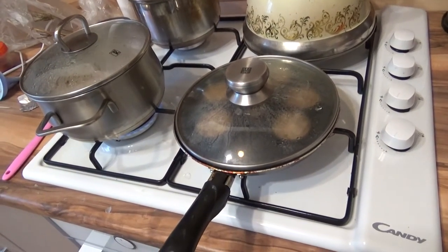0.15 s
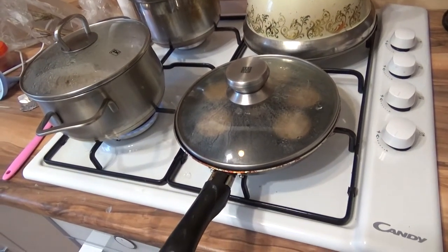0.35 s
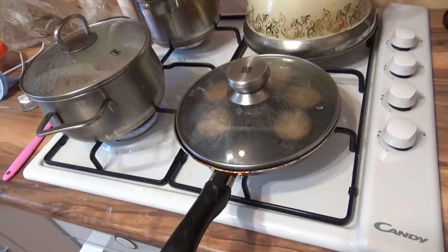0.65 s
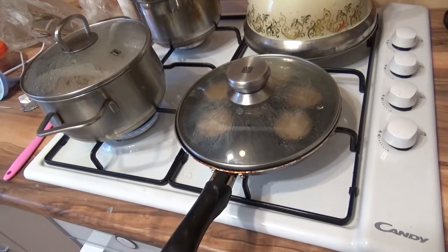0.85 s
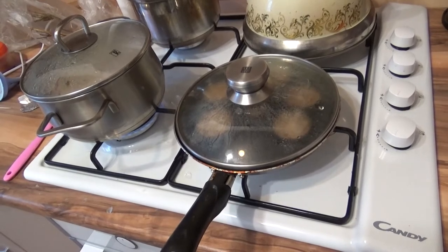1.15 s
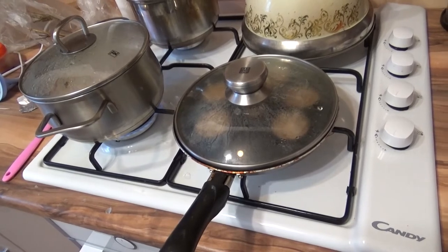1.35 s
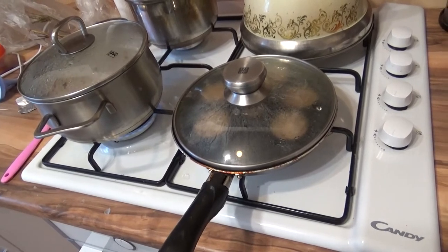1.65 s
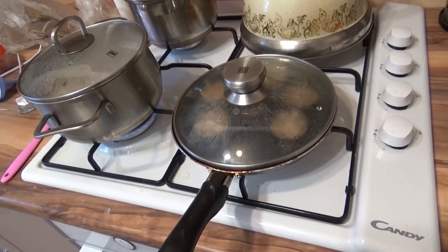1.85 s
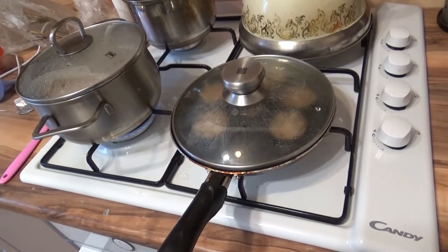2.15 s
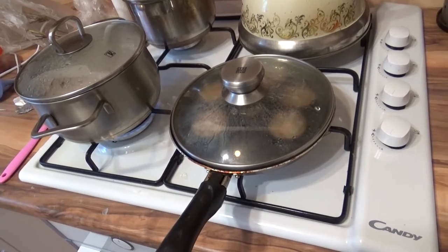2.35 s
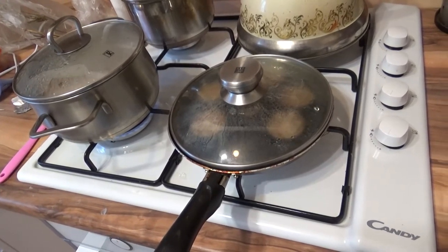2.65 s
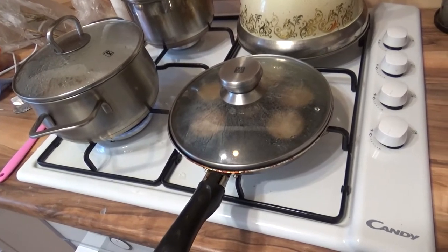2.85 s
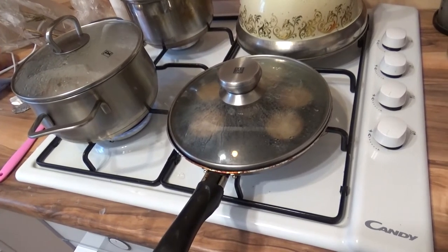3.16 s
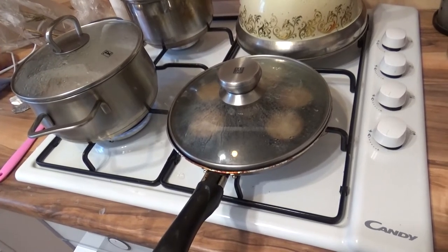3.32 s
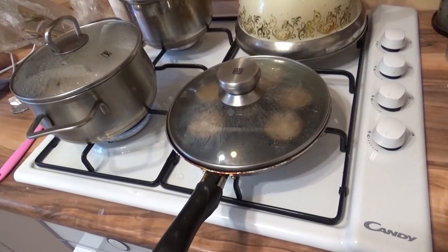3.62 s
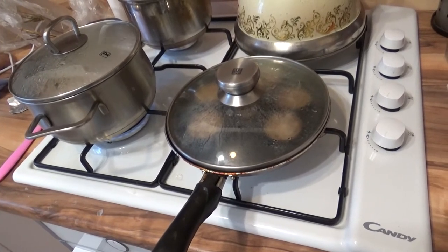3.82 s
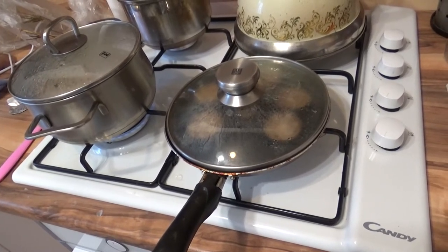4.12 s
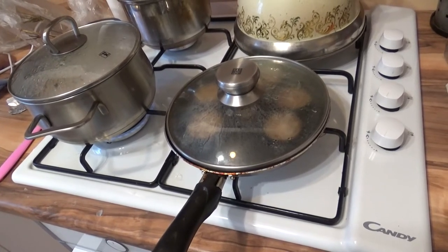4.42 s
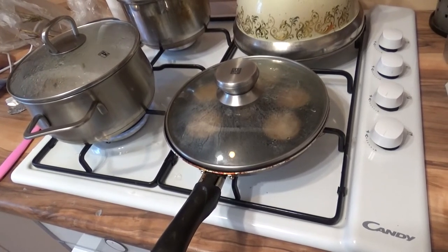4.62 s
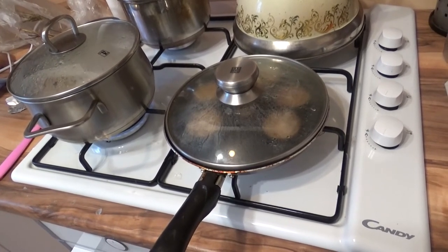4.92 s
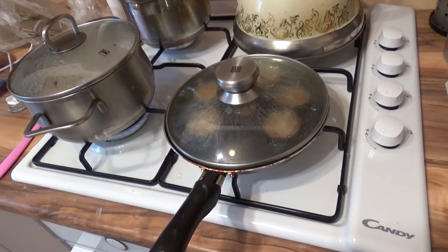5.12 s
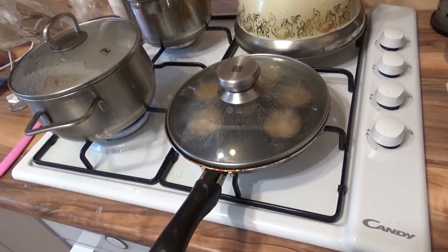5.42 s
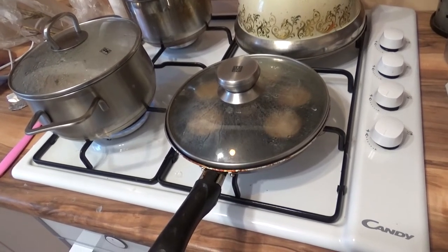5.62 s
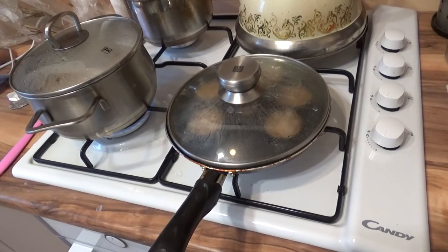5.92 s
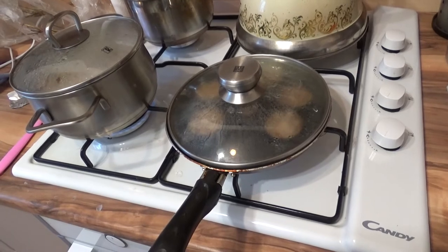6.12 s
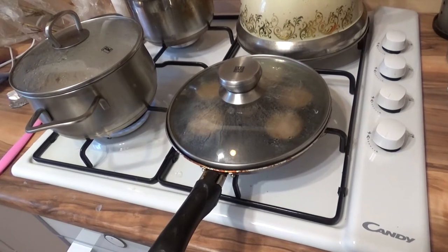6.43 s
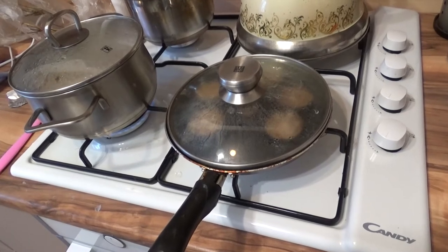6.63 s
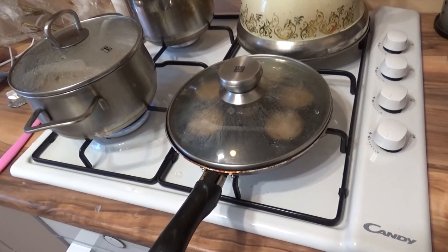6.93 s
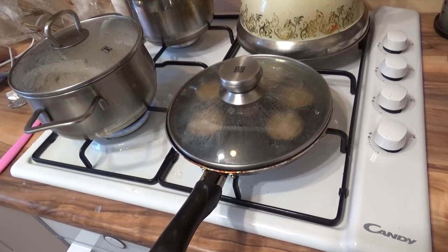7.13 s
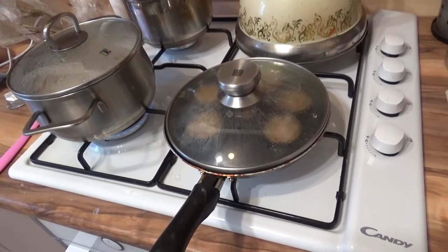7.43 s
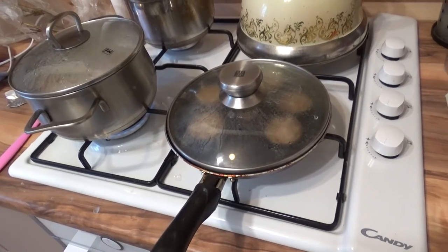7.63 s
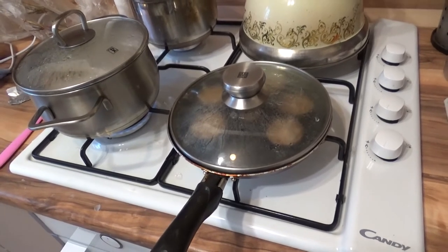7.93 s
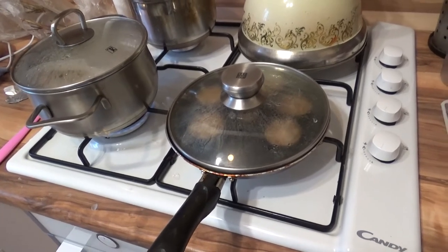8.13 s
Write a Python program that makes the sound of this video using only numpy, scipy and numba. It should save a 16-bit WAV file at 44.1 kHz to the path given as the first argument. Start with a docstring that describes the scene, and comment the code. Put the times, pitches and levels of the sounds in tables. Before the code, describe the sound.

Vegetable slices sizzle in oil in a lidded pan on a gas stove, heard from very close in a small kitchen. A steady fine fizz runs throughout, crossed by irregular bright pops and dry cracks, with occasional soft hollow thumps under the lid. Steam hiss is strongest at the start, then thins. A faint burner rush and a thin high gas whistle stay underneath.

```python
"""Sharp pitched pops and cracks over a steady fine sizzle: vegetable slices fry in oil under a glass lid
on a gas stove, heard from close by in a small kitchen. Bursting steam bubbles are swarms of decaying sines
that glide upward; noise cracks ring modes of pan and lid; bigger steam pockets thump the air under the lid.
Shaped noise makes the hiss of fine bubbles, escaping steam, burners and room; a wavering sine is the thin
whistle of a gas jet."""
import sys
import numpy as np
from scipy import signal
from scipy.fft import rfft, irfft, next_fast_len
from scipy.io import wavfile
from scipy.ndimage import uniform_filter1d
from numba import njit

SR = 44100
rng = np.random.default_rng(int(sys.argv[2]) if len(sys.argv) > 2 else 0)


def wrap_up_sound(samples):
    """Save the sound to the file named by the first command line argument, as 16-bit audio."""
    columns = np.atleast_2d(samples).T
    # keep every value between -1 and 1, then stretch to whole-number steps
    tamed = np.clip(columns, -1, 1)
    steps = np.round(tamed * 32767).astype(np.int16)
    wavfile.write(sys.argv[1], SR, steps)


N = 364707

# loudest bursts: start_s, swarm_db, bubble_pitch_hz, crack_db
BURSTS = [(0.083, -17, 9800, -30), (0.303, -18, 9400, -39), (0.313, -19, 6540, -31),
          (0.389, -32, 7340, -17.5), (0.467, -24, 9600, -24), (0.533, -18.5, 8100, -46),
          (0.609, -8.5, 8300, -17.5), (0.635, -26, 2900, -18), (0.6956, -21.5, 2960, -27),
          (0.731, -20, 10300, -32), (0.749, -15.5, 5500, -38), (0.7866, -17.5, 3180, -17),
          (0.877, -13, 9500, -19), (0.9392, -36, 1960, -16), (0.964, -19.5, 8700, -32),
          (1.001, -15.5, 8700, -27), (1.0903, -18, 9500, -17.5), (1.104, -20, 6900, -24),
          (1.132, -11.5, 10000, -27), (1.295, -21, 7900, -26), (1.3192, -12.5, 6850, -39),
          (1.333, -17, 8650, -29), (1.397, -19.5, 9500, -33), (1.438, -18, 9100, -33),
          (1.492, -9, 7100, -43), (1.539, -12, 9700, -27), (1.592, -15, 6050, -19.5),
          (1.636, -14, 10300, -19.5), (1.687, -9, 8840, -18.5), (1.88, -13.5, 10300, -22.5),
          (1.948, -18, 9280, -19.5), (2.015, -20, 10000, -17), (2.033, -18, 10000, -25),
          (2.127, -29, 2150, -19.5), (2.209, -17, 8300, -29), (2.2317, -5, 8900, -15),
          (2.2563, -21, 9700, -20.5), (2.286, -24, 8000, -21), (2.372, -18, 10000, -47),
          (2.3824, -16.5, 10000, -30), (2.4707, -18.5, 8670, -23), (2.551, -8.5, 7500, -17),
          (2.594, -18, 6540, -23), (2.608, -23, 1970, -19), (2.772, -21.5, 5940, -30),
          (2.9607, -18.5, 9200, -41), (2.9751, -30, 2500, -17), (2.982, -17.5, 6200, -33),
          (3.017, -24, 6300, -20), (3.0679, -21.5, 9050, -21), (3.192, -15.5, 5250, -34),
          (3.232, -12.5, 8400, -19), (3.3029, -9, 8760, -17), (3.326, -28, 2500, -30),
          (3.349, -23, 2500, -22), (3.499, -17, 6400, -24), (3.559, -20, 7060, -48),
          (3.671, -18.5, 7540, -46), (3.694, -19, 7500, -24), (3.8176, -13.5, 4540, -28),
          (3.9324, -19, 6830, -21.5), (3.975, -21, 2550, -22), (4.0035, -22, 4300, -16),
          (4.0284, -13, 4280, -16.5), (4.252, -26, 8600, -16.5), (4.307, -20, 4520, -23),
          (4.392, -21, 7600, -24), (4.405, -17, 10200, -32), (4.432, -12.5, 7100, -14),
          (4.521, -22, 8600, -43), (4.532, -10.5, 8200, -45), (4.587, -24, 3070, -31),
          (4.604, -12.5, 8550, -45), (4.6137, -18, 8800, -20), (4.766, -23, 8700, -25),
          (4.801, -23, 3250, -21), (4.822, -13, 10100, -27), (4.8325, -19, 4540, -23),
          (4.844, -18, 8900, -16), (4.923, -13.5, 9140, -25.5), (5.0048, -17.5, 4960, -22),
          (5.028, -14, 3480, -24), (5.037, -17, 8900, -24), (5.051, -16.5, 3100, -17.5),
          (5.159, -22, 2700, -20.5), (5.28, -22, 6650, -24.5), (5.364, -20, 7440, -31),
          (5.474, -33, 8250, -21), (5.687, -15, 9150, -21), (5.8057, -23, 3770, -43),
          (5.8378, -12.5, 5100, -17), (5.868, -23, 8500, -19), (5.879, -17, 6250, -32),
          (5.891, -30, 6340, -15), (6.345, -13.5, 9440, -25), (6.4421, -17.5, 4700, -32),
          (6.512, -15.5, 8100, -44), (6.5511, -21, 4513, -19.5), (6.6278, -18, 6240, -20),
          (6.6488, -15.5, 8900, -28), (6.6949, -18.5, 2320, -22), (6.7722, -16.5, 7300, -20.5),
          (6.8383, -14.5, 5200, -33.5), (6.8537, -15, 9300, -34), (6.867, -21.5, 9750, -31),
          (6.9137, -16, 4487, -21), (7.039, -15.5, 6200, -33), (7.059, -22.5, 4950, -28),
          (7.0909, -24, 2500, -20.5), (7.137, -12, 4280, -23.5), (7.168, -21.5, 4440, -28.5),
          (7.3344, -24, 2970, -18), (7.36, -22, 6500, -24), (7.421, -15.5, 8350, -42),
          (7.4432, -14.5, 6140, -24.5), (7.513, -9.5, 9140, -25.5), (7.562, -14.5, 5440, -32),
          (7.665, -23, 8440, -17), (7.717, -22, 2620, -16), (7.778, -20, 5200, -22.5),
          (7.8643, -8, 6700, -19), (7.9036, -13, 10100, -17.5), (7.963, -22, 4940, -27),
          (7.993, -16.5, 4460, -25), (8.076, -22, 9700, -17.5), (8.0999, -17, 7650, -22),
          (8.123, -12, 9050, -20), (8.1541, -7.5, 8350, -22.5)]
# spectrum of a crack: freq_hz, gain_db
CRACK_SPECTRUM = [(600, -10.5), (1250, -3), (2200, -8.5), (9000, -0.5), (11500, -5), (14000, -20),
                  (16000, -22)]
FIZZ_LIFE_S = 0.0057  # nominal time for a bubble to fall 53 dB
LEFT_RIGHT = np.array([[1], [-1]])


def undb(db):
    """Amplitude factor of a level in dB."""
    return 10 ** (np.asarray(db) / 20)


def level(x, rms_db):
    """Scale a sound to an RMS level."""
    return x * undb(rms_db) / np.sqrt(np.mean(x ** 2))


def colour(x, points):
    """Shape a spectrum by (freq_hz, gain_db) points, interpolated over log frequency."""
    hz, db = np.transpose(points)
    size = next_fast_len(N)
    f = np.arange(size // 2 + 1) * SR / size + 1  # +1 keeps the log finite
    gain = undb(np.interp(np.log(f), np.log(hz), db))
    return irfft(rfft(x, size) * gain, size)[..., :N]


def band(x, lo_hz, hi_hz):
    """Butterworth band-pass."""
    sos = signal.butter(2, [lo_hz, hi_hz], "bandpass", fs=SR, output="sos")
    return signal.sosfilt(sos, x)


def walk(rate_hz):
    """Random levels held 1 / rate_hz and slewed twice; spread near 1."""
    k = int(SR / rate_hz)
    held = np.repeat(rng.standard_normal(N // k + 1), k)
    return 1.3 * uniform_filter1d(uniform_filter1d(held, k), k)[:N]


def spikes(s, size):
    """Single-sample pushes at the given times."""
    return np.bincount(np.clip((s * SR).astype(int), 0, N - 1), size, N)


def ring(push, modes, scatter_db, turn=1):
    """Pushes ring damped modes, whose gains depend on the place struck; turn=-1 flips every other mode."""
    t = np.arange(SR // 4) / SR
    gains = undb(scatter_db * rng.standard_normal(len(modes))) * turn ** np.arange(len(modes))
    tail = np.zeros(len(t))
    for (hz, db, t60_s), gain in zip(modes, gains):
        tail += gain * undb(db) * np.sin(2 * np.pi * hz * t) * 1000. ** (-t / t60_s)
    return signal.oaconvolve(push, tail)[:N]


def stove():
    """Burner rush and room sound as low shaped noise, plus the whistle of a gas jet as a wavering sine."""
    # rush and room: freq_hz, gain_db
    rush_spectrum = [(20, -17), (60, -12), (120, -9), (160, 2.5), (200, 0), (500, 3.5), (1000, 3),
                     (3000, -10)]
    rush_rms_db, whistle_hz, whistle_rms_db = -56, 9713, -48
    mid, side = rng.standard_normal((2, N))
    rush = level(colour(mid + 0.093 * side * LEFT_RIGHT, rush_spectrum), rush_rms_db)
    pitch_hz = whistle_hz + 4 * walk(0.72) + 11 * walk(45)
    phase = 2 * np.pi * np.cumsum(pitch_hz) / SR
    whistle = np.sqrt(2) * undb(whistle_rms_db + 1.25 * walk(17)) * np.sin(phase)
    return rush + whistle


def steam():
    """Steam escaping at the lid rim: smooth high noise that eases off over some seconds, then rises a little."""
    # level course: time_s, rms_db
    course = [(0, -41.5), (1.2, -44), (2.2, -51), (2.6, -51), (5, -57), (8.27, -52)]
    # hiss spectrum: freq_hz, gain_db
    hiss_spectrum = [(6500, -6), (8500, -4), (10000, -3.5), (12000, -13), (14500, -20), (16000, -39)]
    hiss = level(colour(rng.standard_normal(N), [(2000, -60)] + hiss_spectrum), 0)
    return hiss * undb(np.interp(np.arange(N) / SR, *np.transpose(course)))


def thumps(seethe_db):
    """Steam pockets push the air under the lid and jolt the pan; loud cracks and many weak pockets push it too."""
    # big steam pockets: start_s, thump_db, jolt_db (pan on its grate)
    pockets = [(0.136, -31.5, -69), (0.391, -29.5, -74), (0.871, -21.5, -47.5), (1.605, -25.5, -64),
               (1.634, -25.5, -57), (1.687, -26.5, -50), (2.233, -23, -56), (2.271, -29, -65),
               (2.974, -27, -68), (3.017, -25.5, -67), (3.327, -33, -58), (3.422, -29, -56),
               (3.974, -28.5, -59), (4.019, -25, -52), (4.219, -29, -60), (4.431, -26, -64),
               (5.691, -25.5, -74), (5.842, -32.5, -58), (5.891, -25, -57), (6.207, -30, -66),
               (6.631, -26, -74), (6.697, -30.5, -74), (7.335, -26, -55), (7.719, -24, -73),
               (7.865, -28.5, -66), (8.098, -30.5, -57), (8.124, -28.5, -55)]
    # air under the lid and lowest lid modes: freq_hz, gain_db, t60_s
    hollow = [(283, -3, 0.27), (360, -3, 0.27), (414.9, 10.5, 0.11), (560, -3, 0.042), (436.4, 1, 0.24),
              (459.3, 3.5, 0.31)]
    jolt_hz, jolt_t60_s = 142, 0.091
    crack_push_db, murmur_db = -17.5, -13  # against the crack; against the seething
    s, db, jolt_db = np.transpose(pockets)

    def radiate(x):
        return band(x, 298.4, 524)  # so small a pan radiates no deep bass

    one_push = spikes(np.zeros(1), np.ones(1))
    unit = np.abs(radiate(ring(one_push, hollow, scatter_db=0))).max()  # peak of a unit push
    air, place = np.zeros(N), rng.integers(0, 2, len(s))
    for k in range(2):
        here = place == k
        air += ring(spikes(s[here], undb(db[here])) / unit, hollow, scatter_db=2)
    burst_s, _, _, crack_db = np.transpose(BURSTS)
    air += ring(spikes(burst_s, undb(crack_db + crack_push_db) / unit), hollow, scatter_db=3)
    jolt = ring(spikes(s, undb(jolt_db)), [(jolt_hz, 0, jolt_t60_s)], scatter_db=0)

    u = rng.random((500, 2)).T
    sign = np.sign(rng.standard_normal(len(u[0])))
    weak = spikes(u[0] * N / SR, undb(-3.5 * np.log(u[1] + 0.035)) * sign)
    murmur = level(ring(weak, hollow, scatter_db=0), murmur_db) * undb(seethe_db)
    return radiate(air + murmur) + jolt


@njit
def grains(count, at, step, glide, decay, left, right):
    """Decaying sines with a quick rise, each gliding upward."""
    out = np.zeros((2, count))
    for k in range(len(at)):
        phase, w, a, rise = 0., step[k], 1., 1.
        for i in range(at[k], count):
            phase += w
            w = min(w * glide[k], 2.8)  # rad per sample
            a *= decay[k]
            rise *= .7
            v = a * (1 - rise) * np.sin(phase)
            out[0, i] += left[k] * v
            out[1, i] += right[k] * v
            if a < .003:
                break
    return out


def bubbles(s, hz, db, cycles):
    """Each bubble rings for some cycles at the pitch of its size, somewhere across the pan."""
    rise, pan_db = 0.07, 2.0  # upward glide as a fraction; left-right scatter
    chance = rng.standard_normal((len(s), 2)).T
    length = cycles * np.exp(0.38 * chance[0]) * SR / hz  # samples
    side = undb(pan_db * chance[1] * np.minimum(4000 / hz, 1))
    at = np.clip(s * SR, 0, N - 1).astype(np.int64)
    step = 2 * np.pi * hz / SR
    glide, decay = (1 + rise) ** (1 / length), 0.0023 ** (1 / length)
    return grains(N, at, step, glide, decay, undb(db) * side, undb(db) / side)


def cracks(s, db, hz, t60_s, pan_db):
    """Short noise bursts sound on their own and ring the pan at one of two places; big bubbles crack dull."""
    # pan and lid modes: freq_hz, gain_db, t60_s
    pan_modes = [(1180, -8, .03), (1290, -5, .028), (1910, -11, .035), (2195, -10, .05), (2550, -8, .035),
                 (2950, -6, .04), (3770, -9, .03), (4410, -8, .022), (5470, -12, .03), (6290, -11, .025),
                 (7400, -8, .03), (8570, -1, .05)]
    big_bubble_hz, dull_db, ring_db = 4500, -8.5, -27
    out = np.zeros((2, N))
    kind = 2 * rng.integers(0, 2, len(s)) + (hz < big_bubble_hz)
    fade = np.exp(-np.log(1000) / (t60_s * SR))
    for k in range(4):
        place, dull = k // 2, k % 2
        push = spikes(s[kind == k], undb(db[kind == k]))
        burst = signal.lfilter([1], [1, -fade], push) * rng.standard_normal(N)
        rings = ring(burst, pan_modes, scatter_db=1.5, turn=-1)
        sound = colour(burst, CRACK_SPECTRUM) + undb(ring_db) * rings
        if dull:
            sound = colour(sound, [(3200, 0), (6000, dull_db)])
        out += sound * undb(pan_db * (place - .5) * LEFT_RIGHT)
    return out


def sizzle(seethe_db):
    """Many small bubbles in clusters of five and small cracks; the finest merge into shaped noise."""
    # hiss spectrum: freq_hz, gain_db
    hiss_spectrum = [(400, -2.5), (650, -0.5), (1050, -1), (1270, 5.5), (1640, -2.5), (2040, -1),
                     (2910, 1.5), (5870, -6), (9500, -6), (12500, -26), (14500, -33), (16000, -52)]
    u = rng.random((4000, 4)).T
    nest_s, nest_pitch, nest_odds = np.repeat(rng.random((800, 3)), 5, axis=0).T  # all drawn 0..1
    s = np.minimum(nest_s * N / SR + .012 * u[0], (N - 1) / SR)
    here_db = seethe_db[(s * SR).astype(int)]
    # small, high bubbles are the most common and radiate best
    hz = 2300 * 5.19 ** nest_pitch ** 0.593 * np.exp(0.25 * (u[1] - .5))
    nest_db = 5 * nest_pitch - 3.0 * np.log(np.maximum(nest_odds, .01))
    fizz_db = here_db - 5.0 + nest_db + 6 * u[2]
    fizz = bubbles(s, hz, fizz_db, cycles=np.clip(FIZZ_LIFE_S * hz, 4, 30))

    crack_db = here_db[::3] + 3.0 - 3.88 * np.log(np.maximum(u[3, ::3], .01))
    crackle = cracks(s[::3], crack_db, hz[::3], t60_s=0.0025, pan_db=-2.0)

    mid, side = rng.standard_normal((2, N))
    hiss = level(colour(mid + 0.13 * side * LEFT_RIGHT, hiss_spectrum), 0)
    flicker_db = .8 * walk(40)
    return fizz + crackle + hiss * undb(seethe_db - 8.5 + flicker_db)


def lesser_bursts(seethe_db):
    """Random lesser bursts in the columns of BURSTS; most are small, high bubbles, and low ones are weaker."""
    per_s, top_hz = 18, 10000
    drop = 0.304  # mean fall below top_hz, natural-log units
    swarm_db, swarm_scatter_db, crack_db, crack_scatter_db = 13.5, -2, -2, 8  # levels over the seething
    tilt_db_per_octave = 4.5
    u = rng.random((int(per_s * N / SR), 2)).T
    scatter = np.tanh(rng.standard_normal((u.shape[1], 2)).T)  # bounded
    here_db = seethe_db[(u[0] * N).astype(int)]
    tilt_db = tilt_db_per_octave * drop * np.log2(1 - u[1])
    return [u[0] * N / SR,
            here_db + swarm_db + swarm_scatter_db * scatter[0] + tilt_db,
            top_hz * (1 - u[1]) ** drop,
            here_db + crack_db + crack_scatter_db * scatter[1]]


def pops(seethe_db):
    """A burst is a crack and a swarm of seven bubbles; harder cracks widen the range of their sizes."""
    gap_s, fade_db = .0007, 1.5  # from bubble to bubble
    one_bubble_db, one_bubble_scatter_db = -1.77, 2  # one bubble against the swarm
    note_life_s, most_cycles = 0.0043, 40.4
    click_db, click_most_db = 22, 8  # over the crack; at most this over the swarm
    bursts = np.hstack([np.transpose(BURSTS), lesser_bursts(seethe_db)])
    s, db, hz, crack_db = np.repeat(bursts, 7, axis=1)
    chance = rng.standard_normal((len(s), 3)).T
    turn = np.arange(len(s)) % 7
    late = turn * (1 + 0.23 * chance[0])
    # even turns stay close to one size; odd turns spread with the crack
    odd = turn % 2
    spread = np.where(odd, 0.037 + 0.014 * np.maximum(crack_db + 32.5, 0), .03)
    pitch = np.clip(hz * np.exp(spread * chance[1]), 1500, 10800)
    each_db = db + one_bubble_db - fade_db * late + one_bubble_scatter_db * chance[2]
    cycles = np.where(odd, np.minimum(most_cycles, FIZZ_LIFE_S * pitch), note_life_s * pitch)
    swarm = bubbles(s + gap_s * late, pitch, each_db, cycles)

    # in the loudest bursts the oil film tears with a click
    loud_s, loud_db, _, loud_crack_db = np.transpose(BURSTS)
    tear_db = np.minimum(loud_db + click_most_db, loud_crack_db + click_db)
    click = colour(spikes(loud_s, undb(tear_db)), CRACK_SPECTRUM)
    return click + swarm + cracks(s[::7], crack_db[::7], hz[::7], t60_s=0.023, pan_db=0.5)


def room(dry):
    """Hob, tiles and cupboards send back a short diffuse tail, unlike at the two ears."""
    t60_s, tail_db = 0.25, -7.5
    t = np.arange(SR // 3) / SR
    envelope = 1000. ** (-t / t60_s) * np.minimum(t / 0.0016, 1)
    mid, side = rng.standard_normal((2, len(t))) * envelope
    side_spectrum = [(1000, 8.5), (2500, 4.5), (5000, 7.5), (12000, -6.0)]
    side = colour(np.pad(side, (0, N - len(t))), side_spectrum)[:len(t)]
    tail = (mid + 0.28 * side * LEFT_RIGHT) * undb(tail_db) / np.sqrt(np.sum(mid ** 2))
    return signal.fftconvolve(dry.mean(0)[None], tail)[:, :N]


def scene():
    """Frying with its room tail, over thumps, steam and stove."""
    # how hard the oil seethes: time_s, level_db
    seethe = [(0.0, -36), (0.87, -35.5), (3.04, -37.5), (3.45, -33.5), (3.66, -35.5), (5.37, -37.5),
              (5.8, -35.5), (6.01, -35), (6.679, -36.5), (7.18, -40), (7.49, -37), (8.27, -35)]
    seethe_db = np.interp(np.arange(N) / SR, *np.transpose(seethe))
    frying = band(pops(seethe_db) + sizzle(seethe_db), 467, 14300)
    return frying + room(frying) + thumps(seethe_db) + steam() + stove()


def record(dry):
    """The left microphone is a little weaker in the middle range; the recorder cuts the top."""
    top_hz = 16000
    left = colour(dry[0], [(1200, 0), (2500, -1.5), (6000, -1), (9000, 0)])
    low_pass = signal.ellip(8, .2, 70, top_hz, fs=SR, output="sos")
    return signal.sosfilt(low_pass, np.array([left, dry[1]]))


dry = scene()
out = record(dry)
wrap_up_sound(out)
```